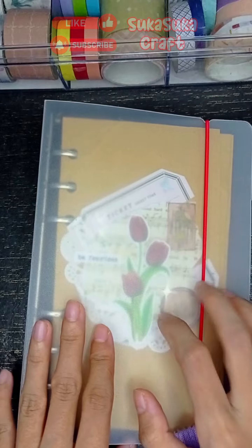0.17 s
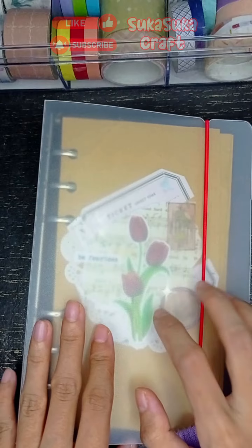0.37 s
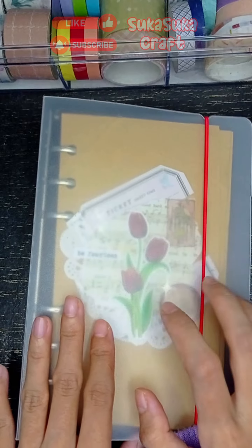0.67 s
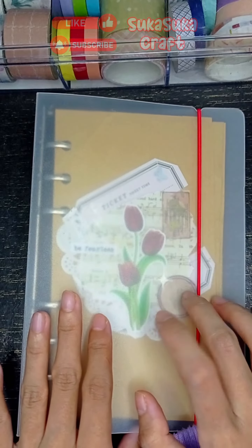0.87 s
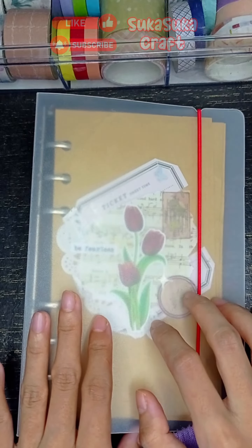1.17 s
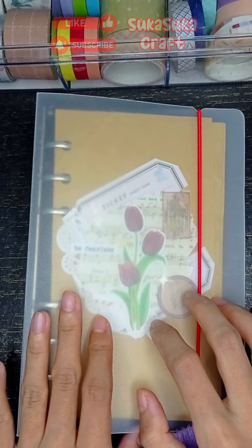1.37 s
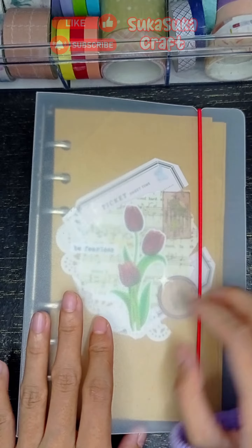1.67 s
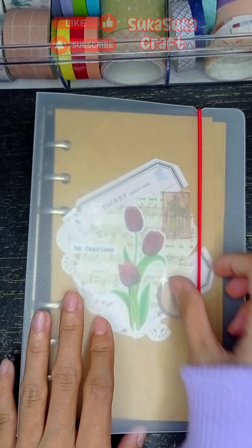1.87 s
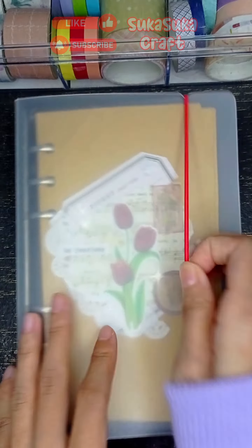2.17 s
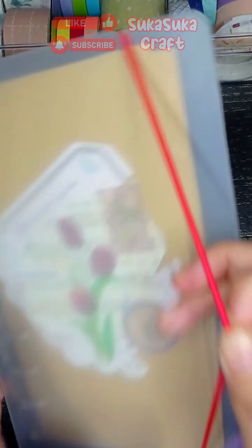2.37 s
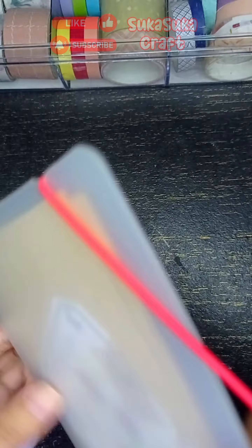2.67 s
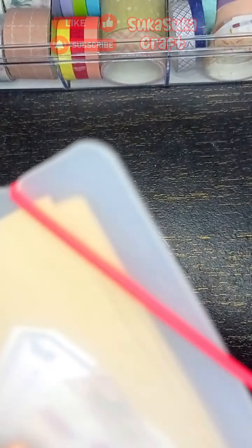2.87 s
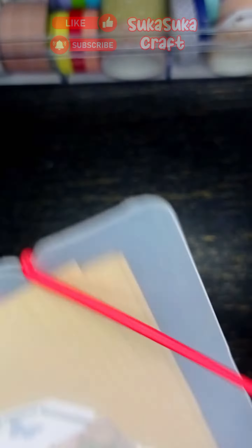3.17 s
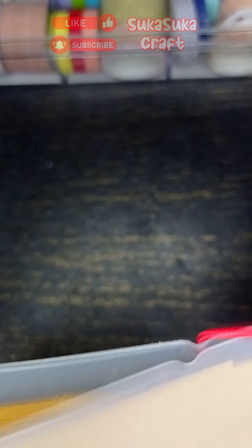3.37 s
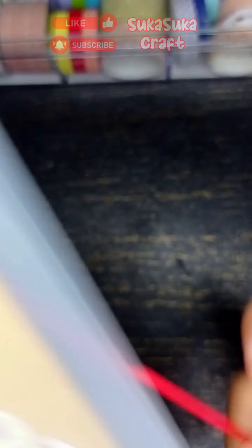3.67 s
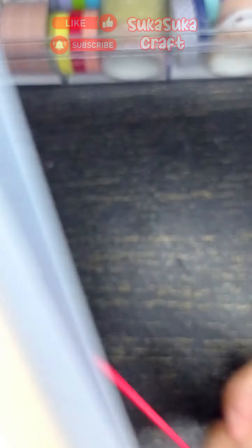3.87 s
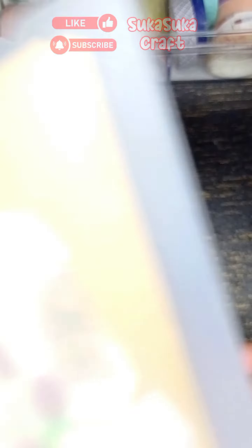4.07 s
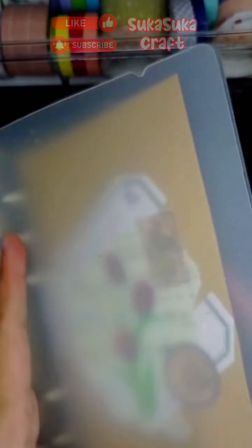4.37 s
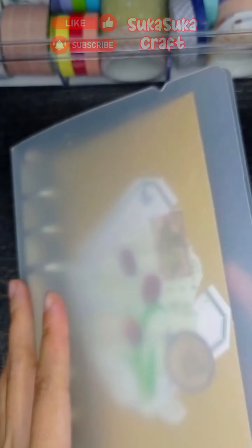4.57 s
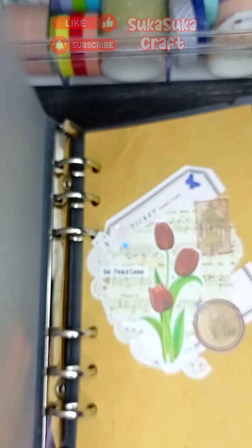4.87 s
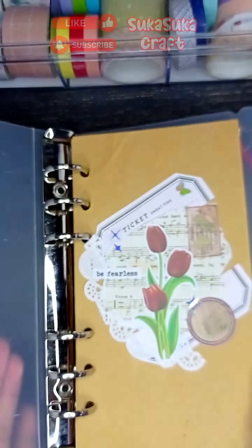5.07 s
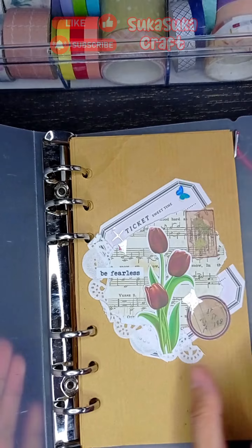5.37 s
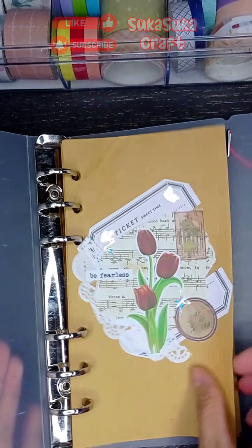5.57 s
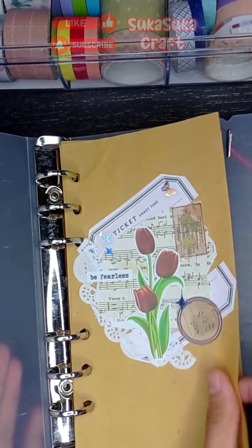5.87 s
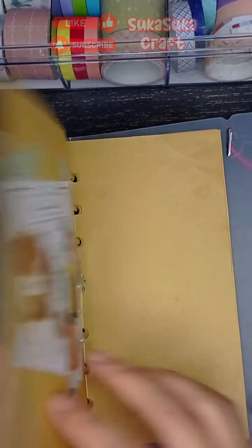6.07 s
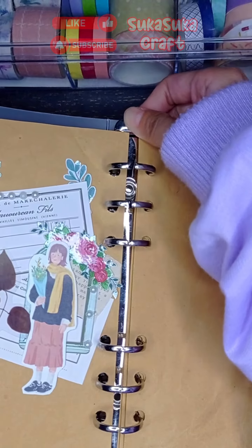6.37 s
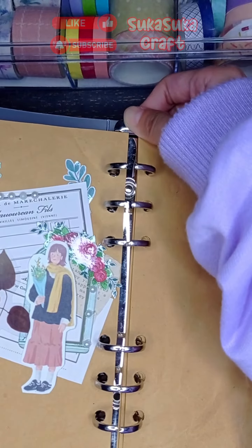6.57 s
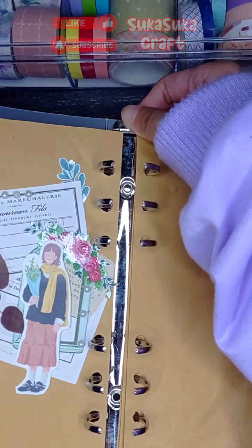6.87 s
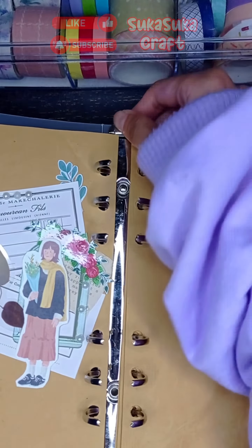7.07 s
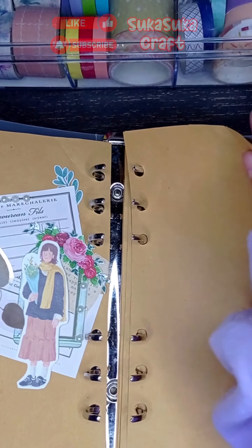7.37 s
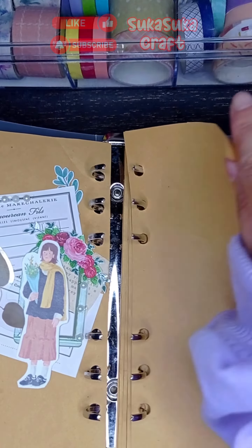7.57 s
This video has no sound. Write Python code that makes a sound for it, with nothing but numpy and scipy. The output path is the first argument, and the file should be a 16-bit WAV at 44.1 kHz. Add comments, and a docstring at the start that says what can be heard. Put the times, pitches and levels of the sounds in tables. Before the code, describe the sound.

Close, crisp nail taps on a plastic binder, then rubbing, squeaks, desk thumps, a page turn and the ringing snap of steel rings.

```python
"""Fingernails tap the plastic cover of a ring binder on a desk, each impact exciting its damped modes.
The binder is lifted, its elastic strap is dragged off, and it is put down and opened with a thump
that rings the desk. A page is turned, the sprung steel rings snap open and a hand brushes the paper.
Stick-slip friction makes the scrapes, rubbing and squeaks. All is heard from close by in a small
room, over a low rumble and a thin hiss."""
import sys
import numpy as np
from scipy import signal
from scipy.fft import rfft, irfft
from scipy.io import wavfile
from scipy.ndimage import uniform_filter1d

SR = 44100
rng = np.random.default_rng(int(sys.argv[2]) if len(sys.argv) > 2 else 0)


def output_pcm(signal):
    """Save a mono or channel-first signal as 16-bit PCM at the path in sys.argv[1].

    Samples are clipped to [-1, 1] before scaling.
    """
    pcm = np.clip(np.atleast_2d(signal).T, -1, 1) * 32767
    wavfile.write(sys.argv[1], SR, np.round(pcm).astype(np.int16))


N = 340011

# Nail taps on the cover. Each row: start in seconds, relative level in dB, tilt of the crack in dB
# per octave, pitch ratio of the spot, peak of the fingertip's thud in dB.
TAPS = [(.2777, 5.5, 0.5, 1.043, -15), (0.4478, 3.5, -2.5, 1.054, -18.5), (.6496, 4.5, 0, 1.033, -24.5),
        (1.0074, -2.5, -3, 1.11, -17.5), (1.085, 2, -0.5, .99, -27), (1.2252, 2.5, -1.5, 1.016, -26.5)]
# Hands and binder bumping the desk. Each row: start in seconds, peak in dB, contact time in seconds.
BUMPS = [(.047, -32, 0.0047), (0.836, -26, 0.0049), (.871, -28, 0.0059), (2.041, -23.5, 0.0076),
         (2.343, -4.5, 0.0022), (2.354, -15.5, 0.0027), (2.493, -28, 0.0073), (2.543, -23, 0.009),
         (2.671, -17.5, 0.0035), (2.698, -27.5, 0.0087), (3.09, -30.5, .0035), (3.896, -21.5, 0.0048),
         (4.8147, .5, .0016), (4.835, -11.5, .0044), (4.933, -25, 0.0042), (5.146, -27.5, 0.0057),
         (5.277, -30.5, 0.0017), (5.323, -30.5, 0.002), (5.719, -21.5, 0.0044), (6.813, -26, 0.0069)]
# The ring halves hitting their stops. Each row: start in seconds, peak in dB.
RING_STOPS = [(6.8105, 3.5), (6.8132, -3)]
# Kinds of contact. Each entry: flex relative to the body in dB, tilt of the crackle in dB per octave,
# share of a scrape spent swelling.
CONTACTS = {"finger": (-15, -3, .55), "strap": (-22, 7.4, .5), "cover": (-6, 7.5, 0.49),
            "flick": (-21.5, -5, 0.11), "brush": (-17.5, 1.9, 0.1), "page edge": (-17.5, 6.4, 0.58)}
# Edges that catch and let go. Each row: start in seconds, contact, body in dB, crackle in dB.
TICKS = [(1.995, "finger", -36, -37.5), (2.019, "finger", -22.5, -30), (2.036, "finger", -25.5, -32.5),
         (2.69, "finger", -19, -25.5), (2.83, "finger", -22, -35), (3.027, "strap", -34, -42),
         (3.087, "cover", -18.5, -15), (3.309, "finger", -40.5, -48), (3.379, "cover", -48, -45.5),
         (3.4681, "strap", -44, -28), (3.506, "cover", -13.5, -29.5), (3.75, "strap", -49.5, -37),
         (3.7996, "strap", -31.5, -33.5), (3.901, "cover", -21.5, -26.5), (4.136, "finger", -32, -42),
         (4.266, "finger", -51, -41), (4.331, "finger", -29, -31.5), (4.372, "finger", -25, -23.5),
         (4.515, "finger", -38, -46.5), (4.656, "strap", -45.5, -40.5), (5.047, "cover", -61, -30.5),
         (5.211, "cover", -43, -40), (5.318, "page edge", -24.5, -25), (5.7095, "cover", -29.5, -23),
         (6.134, "page edge", -37, -37), (7.222, "page edge", -50, -30.5), (7.459, "flick", -53, -42.5),
         (7.504, "flick", -54, -31.5)]
# Short slides. Each row: start and length in seconds, contact, relative body and crackle levels in dB.
SCRAPES = [(0.046, .05, "finger", -43, -57.5), (.809, 0.11, "finger", -38, -50.5),
           (1.806, 0.02, "finger", -31.5, -35), (2.04, 0.035, "finger", -23, -40),
           (2.067, 0.021, "finger", -18.5, -25), (2.212, 0.015, "finger", -32.5, -42.5),
           (2.245, .11, "finger", -28.5, -37.5), (2.345, 0.019, "strap", -36, -37.5),
           (2.526, .028, "finger", -28.5, -53), (2.711, .013, "finger", -24, -30.5),
           (2.778, .011, "strap", -20, -15.5), (2.815, .009, "strap", -19.5, -10),
           (2.884, 0.035, "strap", -58, -36.5), (2.938, 0.054, "strap", -53.5, -27.5),
           (3.527, 0.013, "cover", -18.5, -25), (3.589, 0.021, "cover", -28.5, -27),
           (3.864, 0.017, "cover", -29.5, -36), (3.888, 0.022, "cover", -17, -25.5),
           (4.341, 0.019, "cover", -48, -32), (4.728, .013, "strap", -68, -48.5),
           (4.798, .01, "finger", -28.5, -29.5), (4.814, 0.027, "strap", -35.5, -29.5),
           (5.257, .012, "finger", -38, -32), (5.276, .027, "finger", -30.5, -30),
           (5.417, .024, "flick", -27, -23.5), (5.516, 0.031, "flick", -34, -22.5),
           (5.615, 0.017, "page edge", -34, -33.5), (5.706, .009, "page edge", -26.5, -20.5),
           (5.823, 0.042, "page edge", -52.5, -33.5), (5.913, 0.058, "page edge", -52, -37),
           (6.058, .046, "brush", -36.5, -36), (6.094, 0.048, "page edge", -40, -35.5),
           (7.099, .08, "brush", -42, -28.5), (7.497, 0.049, "brush", -52, -43.5)]
# Hand strokes, from reaching for the strap to smoothing the page. Each row: start, fastest moment and
# end in seconds, gain of the cover's rub in dB, gain of the paper's hiss in dB.
STROKES = [(1.757, 1.89, 2.05, -54.5, -46), (2.634, 2.77, 2.8, -35.5, -45.5),
           (2.855, 3.0, 3.25, -45.5, -46), (3.358, 3.667, 3.81, -39, -43), (3.755, 3.83, 3.98, -35, -40.5),
           (3.946, 4.12, 4.2, -48.5, -50.5), (4.26, 4.371, 4.47, -38.5, -43),
           (4.455, 4.522, 4.6, -43, -49.5), (4.894, 5.104, 5.36, -45, -46), (5.103, 5.27, 5.28, -41, -43),
           (5.406, 5.585, 5.67, -33.5, -41), (5.58, 5.687, 6.24, -70, -42), (7.09, 7.174, 7.34, -44, -37),
           (7.31, 7.393, 7.7, -68, -54), (7.472, 7.558, 7.58, -39.5, -43), (7.62, 7.708, 7.88, -54, -49)]
# Skin and strap squeaking on plastic. Each row: start and length in seconds, pitch in Hz, level in dB.
SQUEAKS = [(1.808, .024, 1023, -32), (2.035, 0.06, 861, -21), (2.526, 0.022, 844, -32.5),
           (2.706, 0.026, 1147, -29), (2.764, 0.044, 1154, -27.5), (2.822, 0.027, 776, -22),
           (4.652, 0.014, 9400, -55), (4.795, 0.0089, 875, -28), (5.414, 0.031, 1100, -26.5)]
# A brief dip in the handling sound after the page turn. Each row: time in seconds, gain in dB.
HANDLING_DIP = [(6.136, 0), (6.14, -30), (6.155, -13), (6.17, 0.5)]
# The changing level of the background. Each row: time in seconds, gain in dB.
BACKGROUND_GAIN = [(0, -65), (.04, 10.5), (.25, 0.5), (1.55, 0), (2, 5.5), (6.18, 8.5), (6.3, -11.5),
                   (6.4, 0.5), (6.75, -1), (7.7, 11)]

# Normal modes. Each row: frequency in Hz, relative level in dB, free 60 dB decay time in seconds.
COVER_MODES = [(290, -16, 0.026), (340, -8, 0.022), (705, -38, .06), (823, -11.5, 0.043), (916, 6, 0.023),
               (1027, -5, 0.045), (1202, -4, 0.024), (1485, -16, 0.044), (2040, -12, 0.017),
               (2312, -1.5, 0.0096), (3100, -43, 0.029), (4250, -23, 0.021), (4900, -22.5, 0.04),
               (5230, -10.5, 0.016), (6050, -10, .014)]  # the plastic cover
HOLLOW_MODES = [(766, -3.5, 0.074), (849, -0.5, 0.033), (906, -4, 0.08), (1174, -14.5, 0.015)]  # the hollow binder on the desk
DESK_MODES = [(104, -11, 0.72), (172.5, -8, 0.6), (208.2, -.5, 0.23), (242, -14.5, 0.2), (289.2, 2.5, 0.12),
              (304, -4.5, .05), (411, -5, 0.045), (458, -11.5, 0.029)]  # the desk top
STEEL_MODES = [(856, -6, 0.39), (1072, 11.5, 0.12), (1260, -8, 0.4), (1840, -15, 0.37), (2130, -10, 0.56),
               (2620, -13, .3), (3450, -7, 0.51), (3620, -9, 0.51), (5230, -13.5, .38), (5960, -12, .3),
               (5950, -13, .28), (6440, 3, 0.28)]  # the spine and rings

# Spectral envelopes. Each row: frequency in Hz, relative level in dB.
FLEX_SPECTRUM = [(50, -24.5), (110, -10.5), (200, -8.5), (320, 0), (500, 1.5), (700, 6), (1200, -47),
                 (4000, -71)]  # the whole sheet bending
BODY_SPECTRUM = [(200, -18), (560, -18), (720, -5), (880, 1), (1150, 0.5), (1500, -7), (2300, -13.5),
                 (4000, -33.5), (12000, -66)]  # the midrange body of the cover
CRACKLE_SPECTRUM = [(400, -57), (1200, -13), (1900, 8), (2700, 6.5), (3500, 3.5), (4500, 0.5), (6500, -1),
                    (7500, -8), (8800, -12.5), (11000, -21.5), (13300, -37.5), (15200, -18.5),
                    (16500, -26.5)]  # the point of contact
RING_SPECTRUM = [(40, -41), (150, -10.5), (300, -21), (620, -12.5), (850, 4), (1250, 1), (1800, -0.5),
                 (2600, -6), (3500, -2.5), (4300, -8), (5800, -2.5), (8500, -17), (12500, -31),
                 (15000, -20), (16500, -27.5)]  # struck steel rings
PAPER_SPECTRUM = [(300, -39.5), (1000, -30.5), (2000, 7.5), (2800, 12), (4500, 8), (6600, 5), (7500, -6.5),
                  (8800, -1.5), (11000, -22), (13300, -18.5), (15200, -17), (16500, -39.5)]  # sliding paper
AIR_SPECTRUM = [(25, -20.5), (50, -12), (85, 0), (200, -3.5), (300, -17), (600, -21), (1500, -25.5),
                (5700, -36.5), (6900, -22), (8200, -49), (14000, -44), (15200, -40.5), (16500, -49.5)]  # room rumble and hiss

# Reverberation of the room. Each row: frequency in Hz, 60 dB decay time in seconds.
ROOM_T60 = [(150, 0.25), (500, 0.2), (1000, 0.2), (3000, 0.25), (7000, 0.23), (15000, 0.13)]

PAD_LAG_S, PAD_CONTACT_S, PAD_T60_S = .013, 0.0056, 0.6  # the soft fingertip behind each nail
# Decay time the hand allows a 0 dB bump; drop in level that doubles that time.
BLOW_T60_S, RING_DOUBLING_DB = 0.11, 9.5
HELD_S, HELD_DB = (1.67, 6.24), (-63, -64)  # the held binder stirs: (from, to), gains (cover, paper)
GRIP_HZ, LONGEST_GRIP_S = (598, 1700), .04  # pitch range and length of the faint squeaks


def nail_taps():
    """Impact excitation: a nail rings the cover's modes, with a thin broadband crack on top."""
    out = np.zeros(N)
    for s, db, tilt_db, pitch, _ in TAPS:
        spot = [(hz * pitch, mode_db, t60) for hz, mode_db, t60 in COVER_MODES]
        ring = -modes(spot, detune=.02, seconds=.12)
        knock = resonate(ring, HOLLOW_MODES, detune=.05, ring_db=-25)
        add(out, s, peak(low_cut(knock, hz=280, order=2), db - 4))
        crack = -colour(impact(t60=0.025, chatter_db=1), CRACKLE_SPECTRUM, tilt_db)
        add(out, s, peak(crack, db - 11.5))
        # the cover slaps the pages beneath as the fingertip presses it down
        bright_slap = colour(impact(t60=0.059, chatter_db=19.5), CRACKLE_SPECTRUM, tilt_db + 3)
        add(out, s + .014, peak(bright_slap, db - 27.5))
        dull_slap = colour(impact(t60=0.044, chatter_db=13), BODY_SPECTRUM)
        add(out, s + .012, peak(dull_slap, db - 23))
    return out


def desk_bumps():
    """Contact damping: fingertips let the desk ring; the harder a bump, the more the hand damps it."""
    out = np.zeros(N)
    for s, *_, pad_db in TAPS:
        add(out, s + PAD_LAG_S, thud(pad_db, PAD_CONTACT_S, PAD_T60_S))
    for s, db, contact_s in BUMPS:
        add(out, s, thud(db, contact_s, hand_t60=BLOW_T60_S * 2 ** (-db / RING_DOUBLING_DB)))
    return out


def thud(db, contact_s, hand_t60):
    """A force pulse acts as a low-pass filter: the longer the contact, the duller the desk's ring."""
    ring = modes(DESK_MODES, detune=0.033, seconds=.4)
    damped = ring * fade(np.arange(len(ring)) / SR, hand_t60)
    pulse = np.hanning(len(clock(contact_s)))
    return peak(low_cut(signal.fftconvolve(damped, pulse), hz=144, order=4), db)


def ring_snap():
    """Snap-through: the sprung spine throws the rings open, and the lightly damped steel rings on."""
    out = np.zeros(N)
    for s, db in RING_STOPS:
        add(out, s, peak(colour(impact(t60=0.02, chatter_db=8.5), RING_SPECTRUM), db))
    start = RING_STOPS[0][0]
    t = clock(.5)
    shimmer = colour(rng.standard_normal(len(t)) * fade(t, t60=0.44), RING_SPECTRUM, tilt_db=1.5)
    add(out, start, peak(shimmer, -16))
    steel = modes(STEEL_MODES, detune=0.0018, seconds=.6)
    add(out, start, level(steel, db=-29.5, seconds=0.06974))
    return out


def ticks():
    """Transients: fingers, strap, cover and page each catch and let go."""
    out = np.zeros(N)
    for s, contact, body_db, crackle_db in TICKS:
        add(out, s, tick(contact, body_db, crackle_db))
    return out


def tick(contact, body_db, crackle_db):
    """Impulsive excitation: the sudden release of an edge jolts the binder."""
    flex_db, tilt_db, _ = CONTACTS[contact]
    force = impact(t60=0.03, chatter_db=7.5)
    return binder(force, .01, body_db + flex_db, body_db, crackle_db, tilt_db)


def scrapes():
    """Stick-slip friction: a run of slips swells with the pressure and dies as the edge slides free."""
    out = np.zeros(N)
    for s, seconds, contact, body_db, crackle_db in SCRAPES:
        flex_db, tilt_db, swell_share = CONTACTS[contact]
        rise = seconds * swell_share
        graze = .5 * seconds  # light contact before the edge bites and after it lets go
        t = clock(seconds + 2 * graze) - graze
        corners_s = [-min(rise, graze), 0, rise, seconds, seconds + graze]
        pressure = amp(np.interp(t, corners_s, [-43.5, -7, 5, -7.5, -31]))
        force = pressure * slips(len(t), per_s=4600, spread_db=2)
        add(out, s - graze, binder(force, seconds, body_db + flex_db, body_db, crackle_db, tilt_db))
    return out * amp(0.5)


def binder(force, seconds, flex_db, body_db, crackle_db, tilt_db):
    """Forced vibration: the whole sheet bends, the hollow cover rings and the contact crackles."""
    force = contact_spot(force, t60=.016, ring_db=-4)
    hollow = resonate(force, HOLLOW_MODES, detune=0.041, ring_db=-19)[:len(force)]
    flex = level(colour(force, FLEX_SPECTRUM), flex_db, seconds)
    body = level(colour(hollow, BODY_SPECTRUM), body_db, seconds)
    crackle = level(colour(force, CRACKLE_SPECTRUM, tilt_db), crackle_db, seconds)
    return flex + body + crackle


def squeaks(faint_count):
    """Friction-driven oscillation: clear squeaks, and faint random ones that follow the rubbing."""
    clear, faint = np.zeros((2, N))
    for s, seconds, hz, db in SQUEAKS:
        add(clear, s, squeak(seconds, hz, db))
    for when, length, pitch in rng.random((faint_count, 3)):
        grip = squeak(LONGEST_GRIP_S * (1 + length) / 2, np.interp(pitch, [0, 1], GRIP_HZ), db=0)
        add(faint, np.interp(when, [0, 1], HELD_S), grip)
    cover_gain, _ = rub_gains()
    return clear + faint * cover_gain


def squeak(seconds, hz, db):
    """Nearly periodic stick and slip gives a brief, rough tone with a second harmonic."""
    size = len(clock(seconds))
    wobble, swell_db = 10 * uniform_filter1d(rng.standard_normal((2, size)), size=100, axis=1)
    phase = 2 * np.pi * np.cumsum(hz * (1 + 0.056 * wobble)) / SR
    tone = np.sin(phase) + amp(-14.5) * np.sin(2 * phase)
    return level(tone * amp(swell_db) * signal.windows.tukey(size, .6), db, seconds)


def rubbing():
    """Friction noise: skin, plastic and paper slide over each other with an unsteady grip."""
    cover_gain, hiss_gain = rub_gains()
    force = sliding_spots(count=5)
    body = level(colour(force, BODY_SPECTRUM)[:N], -3, N / SR)
    flex = level(colour(force, FLEX_SPECTRUM)[:N], -11, N / SR)
    hiss = level(colour(force, PAPER_SPECTRUM)[:N], -0.47, N / SR)
    return (body + flex) * cover_gain + hiss * hiss_gain


def sliding_spots(count):
    """Superposition: several spots rub at once, and the timbre shifts as the grip wanders among them."""
    force = np.zeros(N)
    for _ in range(count):
        grip = amp(3 * wander(per_s=16) + 2.5 * wander(per_s=120))
        catches = grip * slips(N, per_s=220, spread_db=6)
        force += contact_spot(catches, t60=.018, ring_db=3)[:N]
    return force


def rub_gains():
    """Friction noise grows with sliding speed: gains of the cover's rub and of the paper's hiss."""
    t = np.arange(N) / SR
    gains = np.outer(amp(HELD_DB), (t > HELD_S[0]) & (t < HELD_S[1]))
    for start, fastest, end, *stroke_db in STROKES:
        speed = np.interp(t, [start, fastest, end], [0, 1, 0])
        gains += np.outer(amp(stroke_db), speed ** 1.2)  # a power above 1 softens the start and end
    return gains


def crinkles(count):
    """Random transients: the held binder ticks faintly, in proportion to the paper's hiss."""
    out = np.zeros(N)
    for when, size in rng.random((count, 2)):
        db = 4 * (2 * size - 1)
        add(out, np.interp(when, [0, 1], HELD_S), tick("cover", body_db=db - 4, crackle_db=db))
    _, hiss_gain = rub_gains()
    return out * hiss_gain


def room(x, wet_db):
    """Reverberation: diffuse reflections die away exponentially, each band at its own rate."""
    t = clock(.6)
    noise = rfft(rng.standard_normal(len(t)))
    log_f = np.log(np.maximum(np.fft.rfftfreq(len(t), 1 / SR), 1))
    hz, t60s = np.transpose(ROOM_T60)
    bands = [irfft(noise * np.interp(log_f, np.log(hz), band), len(t)) for band in np.eye(len(hz))]
    tail = sum(band * fade(t, t60) for band, t60 in zip(bands, t60s))
    tail *= np.clip(t / 0.0025, 0, 1)
    return signal.fftconvolve(x, level(tail, wet_db, 1 / SR))[:N]


def background():
    """Ambient noise: a low room rumble and a thin hiss near 7 kHz, wavering in level."""
    air = level(colour(rng.standard_normal(N), AIR_SPECTRUM)[:N], -59, N / SR)
    return air * amp(curve(BACKGROUND_GAIN) + 0.87 * wander(per_s=5.8))


def impact(t60, chatter_db):
    """Contact force: one impulse and the decaying chatter that follows."""
    t = clock(2 * t60)
    force = level(rng.standard_normal(len(t)) * fade(t, t60), chatter_db, 1 / SR)
    force[0] += 1
    return force


def slips(size, per_s, spread_db):
    """Friction as a Poisson process: tiny slips of unequal strength over a faint noise floor."""
    happens = rng.random(size) < per_s / SR
    strength = amp(spread_db * np.clip(rng.standard_normal(size), -2, 2))
    return strength * (happens + .03) * rng.choice([-1, 1], size)


def modes(table, detune, seconds):
    """Free vibration is a sum of damped sinusoids; the grip of the hands detunes each a little."""
    t = clock(seconds)
    shifts = 1 + detune * rng.standard_normal(len(table))
    return sum(amp(db) * fade(t, t60) * np.sin(2 * np.pi * hz * shift * t)
               for (hz, db, t60), shift in zip(table, shifts))


def resonate(x, table, detune, ring_db):
    """Resonance: the sound plus the ringing that it drives in a set of modes."""
    response = level(np.gradient(modes(table, detune, seconds=.15)), ring_db, 1 / SR)
    response[0] += 1
    return signal.fftconvolve(x, response)


def contact_spot(force, t60, ring_db):
    """Modal coupling: each spot of a sheet favours its own dozen resonances."""
    spot = [(hz, 0, t60) for hz in np.geomspace(1000, 7000, 12)]
    return resonate(force, spot, detune=0.074, ring_db=ring_db)


def low_cut(x, hz, order):
    """High-pass filter: thins the deep bass of the knocks and thuds."""
    return signal.sosfilt(signal.butter(order, hz, "high", fs=SR, output="sos"), x)


def colour(x, spectrum, tilt_db=0):
    """Minimum-phase filter with a given spectrum, tilted by tilt_db per octave from 2 to 8 kHz."""
    size = 2048
    f = np.maximum(np.fft.rfftfreq(size, 1 / SR), 1)
    hz, db = np.transpose(spectrum)
    octaves = np.log2(np.clip(f, 2000, 8000) / 2000)
    gain = amp(np.interp(np.log(f), np.log(hz), db) + tilt_db * octaves)
    cepstrum = irfft(np.log(gain))
    cepstrum[1:size // 2] *= 2  # folding the cepstrum makes the filter causal
    cepstrum[size // 2 + 1:] = 0
    return signal.fftconvolve(x, irfft(np.exp(rfft(cepstrum))))


def wander(per_s):
    """Smoothed random steps with a standard deviation of 1."""
    hold = int(SR / per_s)
    steps = np.repeat(rng.standard_normal(N // hold + 1), hold)
    smooth = uniform_filter1d(uniform_filter1d(steps, hold), hold)[:N]
    return smooth / smooth.std()


def amp(db):
    """Decibels to gain."""
    return 10 ** (np.asarray(db) / 20)


def clock(seconds):
    """Sample times of a short sound."""
    return np.arange(max(int(seconds * SR), 4)) / SR


def fade(t, t60):
    """Exponential decay of 60 dB in t60 seconds."""
    return np.exp(-np.log(1000) * t / t60)


def curve(rows):
    """Linear interpolation of a timed table, sample by sample."""
    return np.interp(np.arange(N) / SR, *np.transpose(rows))


def add(track, s, sound):
    """Mix a sound in at s seconds."""
    i = max(int(s * SR), 0)
    track[i:i + len(sound)] += sound[:N - i]


def peak(x, db):
    """Scale to a peak level."""
    return x * amp(db) / np.abs(x).max()


def level(x, db, seconds):
    """Scale so that the energy, spread over the given time, has this rms level."""
    return x * amp(db) * np.sqrt(seconds * SR / np.sum(x ** 2))


def scene():
    """Superposition of the handling sounds, their reverberation and the background, in one channel."""
    hands = nail_taps() + desk_bumps() + ticks() + scrapes() + squeaks(faint_count=60)
    hands = hands + rubbing() + ring_snap() + crinkles(count=35)
    in_room = hands + room(hands, wet_db=-14)
    return (in_room * amp(curve(HANDLING_DIP)) + background())[None]


def record(dry):
    """Clipping and band limiting: the loudest peaks flatten and the treble ends at 15.9 kHz."""
    low_pass = signal.ellip(8, .2, 70, 15900, fs=SR, output="sos")
    return signal.sosfilt(low_pass, np.clip(dry, -1, 1))


dry = scene()
out = record(dry)
output_pcm(out)
```